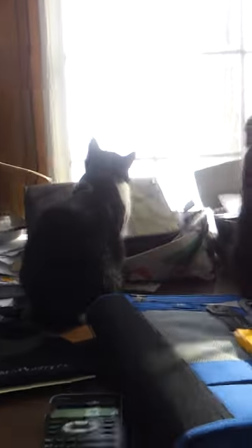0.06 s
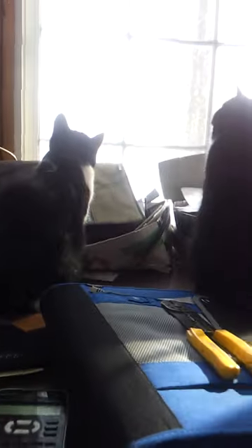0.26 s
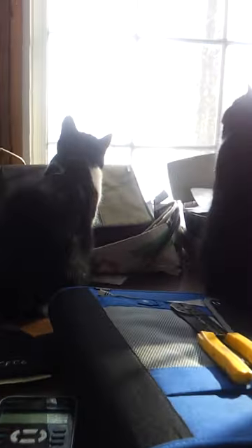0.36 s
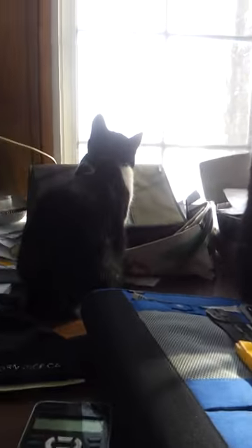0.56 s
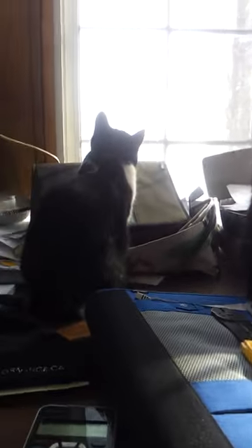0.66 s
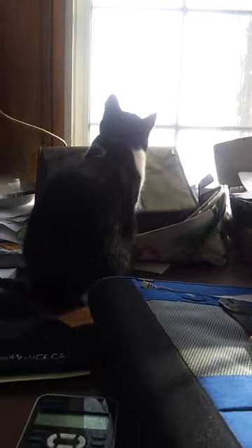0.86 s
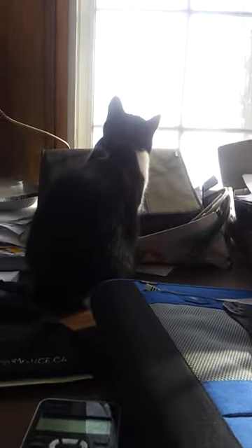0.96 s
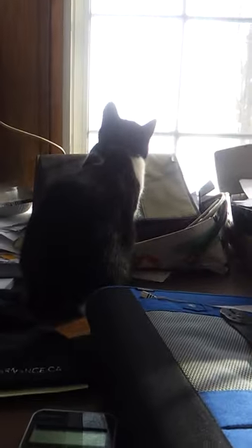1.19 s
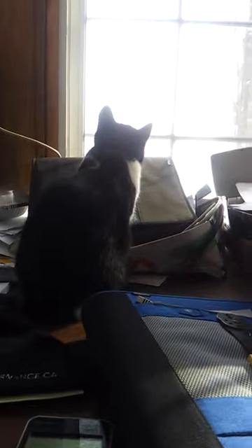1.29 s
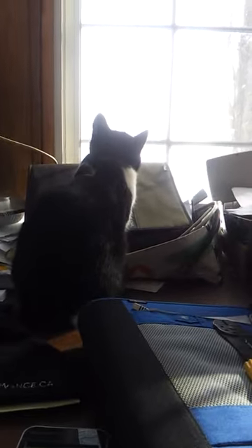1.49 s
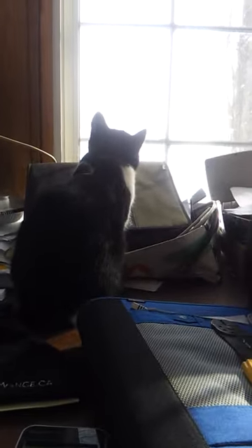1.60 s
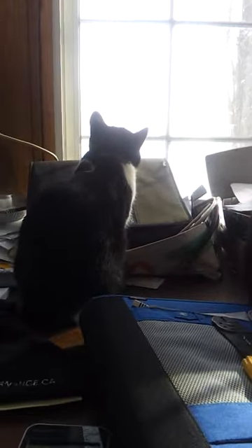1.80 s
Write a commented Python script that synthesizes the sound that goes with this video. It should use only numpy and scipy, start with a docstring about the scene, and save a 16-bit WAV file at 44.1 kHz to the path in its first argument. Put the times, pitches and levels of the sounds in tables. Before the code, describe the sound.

A finger rubs the camera casing right at the microphone, a rapid swelling scuff with ticks, low bumps and crackling snaps, then cuts away to quiet room tone, steady hiss and faint appliance whine.

```python
"""A finger slides over the casing of a hand-held camera, close to the microphone, harder and harder, then fades.
The rub is a dense run of tiny slips blended with hiss; snaps, light ticks and low bumps of pressure break into it.
The grip shakes the casing as low-passed noise. Around it lies a quiet room: drifting noise for room tone and
recorder hiss, wavering sines for faint appliance tones. A brief rustle of resonant noise comes in at the end."""
import sys
import numpy as np
from scipy import signal
from scipy.io import wavfile
from scipy.ndimage import uniform_filter1d

SR = 44100
rng = np.random.default_rng(int(sys.argv[2]) if len(sys.argv) > 2 else 0)


def magnitude_from_level(level_db):
    """Linear magnitude for a level in decibels (20 dB per decade)."""
    exponent = np.asarray(level_db, float) / 20
    return 10 ** exponent


def master_out(mix):
    """Clip the mix to full scale and print it as 16-bit PCM to the path in sys.argv[1]."""
    frames = np.transpose(np.atleast_2d(mix))
    ceiling = np.clip(frames, -1, 1)
    pcm = np.round(ceiling * 32767).astype(np.int16)
    wavfile.write(sys.argv[1], SR, pcm)


N = 81585  # length in samples, 1.85 s


def evened(x):
    """Scales to rms 1."""
    return x / np.sqrt(np.mean(x ** 2) + 1e-20)


def read_spectrum(points, hz):
    """Reads a spectrum table along a log frequency axis."""
    f, value = np.transpose(points)
    return np.interp(np.log(hz + 1), np.log(f + 1), value)


def add(mix, s, sound):
    """Mixes a sound in at s seconds, cut off at the end of the mix."""
    part = mix[round(s * SR):][:len(sound)]
    part += sound[:len(part)]


def resonate(x, hz, width):
    """A resonance of gain 1: shift hz down to zero, smooth with a one-pole filter, shift back."""
    turn = np.exp(2j * np.pi * hz * np.arange(len(x)) / SR)
    pole = np.exp(-np.pi * width / SR)
    smooth = signal.lfilter([1 - pole], [1, -pole], x / turn)
    return 2 * (turn * smooth).real


def minimum_phase(points):
    """Minimum-phase taps with the given spectrum, so that no sound comes ahead of its cause."""
    hz = abs(np.fft.fftfreq(4096, 1 / SR))
    log_gain = np.log(magnitude_from_level(np.maximum(read_spectrum(points, hz), -60)))
    return np.fft.ifft(np.exp(np.conj(signal.hilbert(log_gain)))).real[:2048]


def low_pass(x, hz):
    """Zero-phase low-pass."""
    return signal.sosfiltfilt(signal.butter(2, hz, fs=SR, output="sos"), x)


def room_tone():
    """Room tone and hiss: random short-time spectra with faint patches and a slow drift of level."""
    # colour of the quiet room and hiss: f/Hz, relative level per Hz/dB
    colour = [(15, -40), (25, -10.5), (101, -5), (140, -11), (169, -1), (322, -2.5), (434, -1), (523, -2.5),
              (743, -3.5), (827, -4), (1030, -8.5), (1270, -7.5), (1460, -9), (2560, -10), (3840, -15.5),
              (4160, -14.5), (7320, -19), (14300, -20.5), (15600, -21)]
    # slow drift: t/s, level below the split/dB, level above it/dB
    drift = [(0, 1.5, -1), (.12, 0, 0.5), (.35, 0.5, 0), (.55, 1, 0.5), (.8, -0.5, 1), (1.2, 0, 0),
             (1.6, -1.5, 0), (1.85, -0.5, 0.5)]
    split_hz, patch_db, level_db = 1360, .8, -62.5  # patch_db: rms unevenness; level_db: overall rms
    frames, hz = N // 256 + 5, np.fft.rfftfreq(1024, 1 / SR)
    real, imaginary, patches = rng.standard_normal((frames, 513, 3)).T
    patches = uniform_filter1d(patches, 10, 0)  # over frequency
    patches = evened(uniform_filter1d(patches, 12, 1))  # over time
    s, low_db, high_db = np.transpose(drift)
    t = np.arange(frames) * 256 / SR
    upper = (1 / (1 + (split_hz / (hz + 1)) ** 4))[:, None]  # soft crossover
    drift_db = (1 - upper) * np.interp(t, s, low_db) + upper * np.interp(t, s, high_db)
    gain = magnitude_from_level(read_spectrum(colour, hz)[:, None] + patch_db * patches + drift_db)
    spectra = (real + 1j * imaginary) * gain
    noise = signal.istft(spectra, nperseg=1024, noverlap=768)[1][:N]
    return magnitude_from_level(level_db) * evened(noise)


def whines():
    """Faint appliance tones: steady sines whose phase wanders at random, which widens each line a little."""
    # thin tones in the room: f/Hz, rms level/dB
    tones = [(818.3, -77), (1238, -79.5), (1292, -82), (1335, -85), (1809, -87.5), (2261, -84), (2654, -87)]
    width_hz = 4
    t, out = np.arange(N) / SR, np.zeros(N)
    for hz, db in tones:
        wander = np.cumsum(rng.standard_normal(N)) * np.sqrt(2 * np.pi * width_hz / SR)
        out += magnitude_from_level(db) * np.sqrt(2) * np.sin(2 * np.pi * (hz * t + rng.random()) + wander)
    return out


def rumble():
    """The hand's grip shakes the casing: low-passed noise under a level curve."""
    # shaking of the grip: t/s, level/dB
    shaking = [(.13, -79), (.145, -55), (.19, -55), (.23, -63), (.26, -56), (.29, -67), (.34, -63),
               (.38, -77), (.6, -78), (.7, -90)]
    top_hz = 54.7
    s, db = np.transpose(shaking)
    t = np.arange(N) / SR
    held = (t > s[0]) * (t < s[-1])
    return magnitude_from_level(np.interp(t, s, db)) * held * evened(low_pass(rng.standard_normal(N), top_hz))


def rub():
    """Dense slips of uneven size blended with hiss, coloured by the casing, under the finger's pressure."""
    # finger on the casing: t/s, level before the band gains/dB, bass gain/dB, presence gain/dB,
    # treble gain/dB, smooth hiss as a share of power/0-1
    slide = [(.135, -70, 14, -3, -3, 0.3), (.148, -61, 6, -2, -4, 0.3), (.152, -55, 4, -6, -5, 0.5),
             (0.161, -51, 3, -2, -5, 0.5), (.172, -51, 4, -2, -4, 0.24), (.198, -48.5, 4, 1, -3, 0.2),
             (.206, -41.5, 2, 1, -4, 0.27), (.216, -36.5, 3, 1, -4.5, 0.15),
             (.232, -31, -2.5, -1.5, -1.5, 0.31), (.24, -28.5, 0.5, -4.5, -0.5, 0.52),
             (0.247, -33, -2.5, 1, 2.5, 0.42), (.254, -44.5, 3.5, 10.5, 10, .7),
             (.27, -51.5, -5.5, 10, 8, .7), (.288, -58, 0, 12, 5, .7), (.3, -68, -4, 10, 12, .7),
             (.32, -82, -7, 10, 8, .7)]
    # colour of the casing: f/Hz, relative level per Hz/dB
    colour = [(88, -43), (150, -4), (471, -1.5), (1090, -5), (1220, -1), (2140, -7), (2360, -4.5),
              (3620, -10.5), (4750, -12), (15500, -34.5)]
    # low-pass corners that part bass, middle, presence and treble: f/Hz
    splits = (940, 3700, 6100)
    slips_per_s, spread_db, back_share = 5000, 3, .2  # back_share: share that slip the other way
    sizes = magnitude_from_level(spread_db * np.minimum(rng.exponential(1, N), 3))
    slips = sizes * (rng.random(N) < slips_per_s / SR)
    slips = slips * np.where(rng.random(N) < back_share, -1, 1)
    s, *columns = np.transpose(slide)
    t = np.arange(N) / SR
    level_db, bass_db, presence_db, treble_db, hiss = (np.interp(t, s, c) for c in columns)
    hiss = np.clip(hiss, 0, 1)
    grain = evened(slips - slips.mean())
    drive = np.sqrt(1 - hiss) * grain + np.sqrt(hiss) * rng.standard_normal(N)
    body = evened(signal.oaconvolve(drive, minimum_phase(colour))[:N])
    # each signal below reaches from the lowest tones up to its split
    to_bass, to_mid, to_presence = (low_pass(body, hz) for hz in splits)
    mix = magnitude_from_level(bass_db) * to_bass + to_mid - to_bass
    mix += magnitude_from_level(presence_db) * (to_presence - to_mid)
    mix += magnitude_from_level(treble_db) * (body - to_presence)
    return magnitude_from_level(level_db) * mix * (t > s[0]) * (t < s[-1])


def bumps():
    """Half-sine humps of pressure at the microphone, which leaks slow pressure away as a high-pass."""
    # pressure pushed at the microphone: start t/s, length/s, level before scale and leak/dB
    pushes = [(.1496, .0028, -44), (.1635, .005, -37.5), (.183, .004, -46), (.2408, .0024, -27),
              (.2475, .016, -39), (.7065, .003, -57)]
    # pressure pulled from the microphone: same columns
    pulls = [(.1525, .0038, -41), (.2431, .004, -18.5), (.7095, .005, -57)]
    leak_hz = 21.9
    out = np.zeros(N)
    for scale, humps in ((0.85, pushes), (-0.98, pulls)):
        for s, length, db in humps:
            hump = np.sin(np.pi * np.arange(0, length, 1 / SR) / length)
            add(out, s, scale * magnitude_from_level(db) * hump)
    return signal.lfilter(*signal.butter(1, leak_hz, "high", fs=SR), out)


def ticks():
    """Light ticks of a nail or seam on the casing: heavily damped rings, softened by a low-pass."""
    # ticks: t/s, peak level before the low-pass/dB, f/Hz, time to fall 60 dB/s
    taps = [(.1497, -37, 4640, 0.0013), (.1499, -44, 2000, 0.0033), (0.1578, -37.5, 3600, 0.0015),
            (0.163, -42, 3500, 0.0018), (0.4995, -46.5, 1010, 0.0063)]
    top_hz = 7500
    out, t = np.zeros(N), np.arange(600) / SR
    for s, db, hz, t60 in taps:
        add(out, s, magnitude_from_level(db - 60 * t / t60) * np.cos(2 * np.pi * hz * t))
    return low_pass(out, top_hz)


def snaps():
    """Skin sticks, stretches and lets go at once: a pressure ramp, a drop past rest and a short ring."""
    # snaps: release t/s, ramp peak before rounding off/dB, stretch/s, rounding-off f/Hz
    releases = [(.2029, -23, .0004, 9000), (.2155, -25, .0003, 6000), (.2263, -25, .0003, 5000),
                (.2337, -24, .0003, 4000), (.2362, -23, .0004, 4500), (.2417, -18, .0003, 4000),
                (.2425, -12, .0004, 4200)]
    ring_hz, ring_share, ring_t60_s = 1800, .55, .004  # ring_share: drop past rest, share of the ramp
    lead = 44  # samples of silence, room for the zero-phase filter to spread back
    out, t = np.zeros(N), np.arange(600) / SR
    ring = -ring_share * magnitude_from_level(-60 * t / ring_t60_s) * np.cos(2 * np.pi * ring_hz * t)
    for s, db, stretch, hz in releases:
        ramp = np.arange(0, 1, 1 / (stretch * SR))
        shape = np.concatenate([np.zeros(lead), ramp, ring])
        add(out, s - stretch - lead / SR, magnitude_from_level(db) * low_pass(shape, hz))
    return out


def rustle():
    """Noise through broad resonances, each passed twice, with a quick rise and a fade."""
    # resonances: f/Hz, width of one pass/Hz, relative level/dB
    resonances = [(2300, 1200, 0), (4000, 800, -2), (5500, 1500, -4)]
    start_s, rise_s, fade_db_per_s, level_db = 1.83, 0.0036, -300, -60  # level_db: before rise and fade
    noise = rng.standard_normal(N)
    t = np.maximum(np.arange(N) / SR - start_s, 0)
    sound = np.zeros(N)
    for hz, width, db in resonances:
        once = resonate(noise, hz, width)
        sound += magnitude_from_level(db) * evened(resonate(once, hz, width))
    return magnitude_from_level(level_db + fade_db_per_s * t) * evened(sound) * np.minimum(t / rise_s, 1)


def scene():
    """All sources at the one microphone, mono."""
    background = room_tone() + whines()
    handling = rumble() + rub() + bumps() + ticks() + snaps() + rustle()
    return (background + handling)[None]


def top_cut(x):
    """Nothing passes above the cut-off."""
    return signal.sosfilt(signal.butter(12, 15700, fs=SR, output="sos"), x)


def record(dry):
    """Band limit: a steep linear-phase low-pass takes off the top of the treble."""
    edge_hz = 15700
    taps = signal.firwin(511, edge_hz, window=("kaiser", 9), fs=SR)
    mix = signal.oaconvolve(dry, taps[None], "same")
    return top_cut(mix)


dry = scene()
out = record(dry)
master_out(out)
```